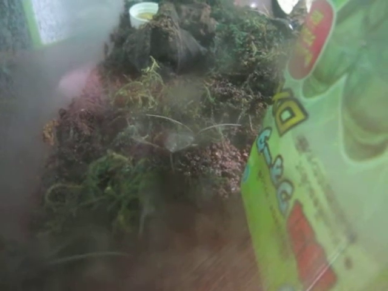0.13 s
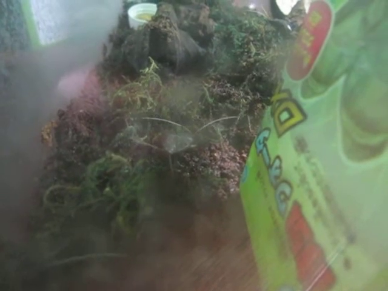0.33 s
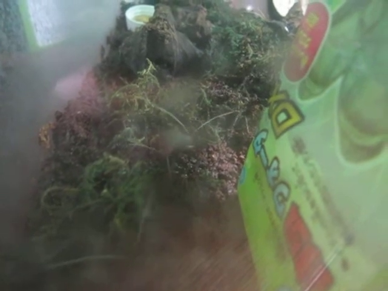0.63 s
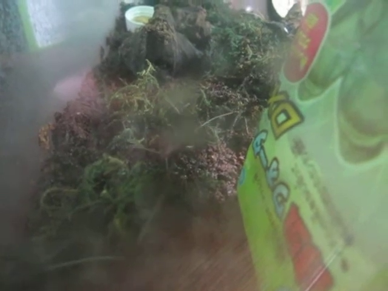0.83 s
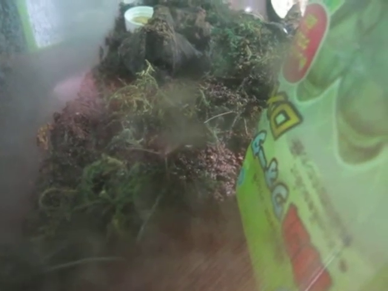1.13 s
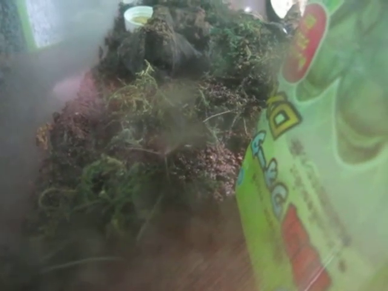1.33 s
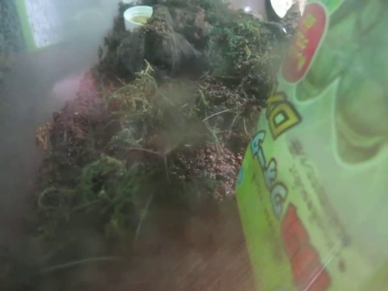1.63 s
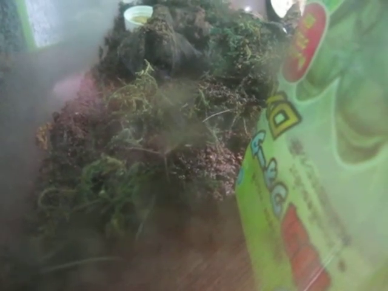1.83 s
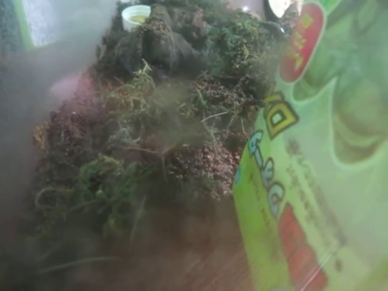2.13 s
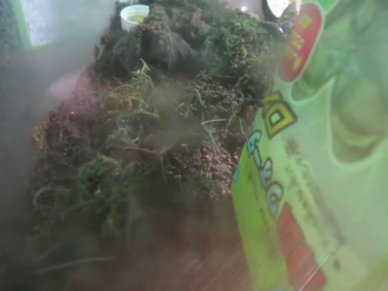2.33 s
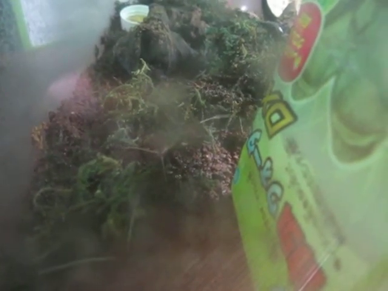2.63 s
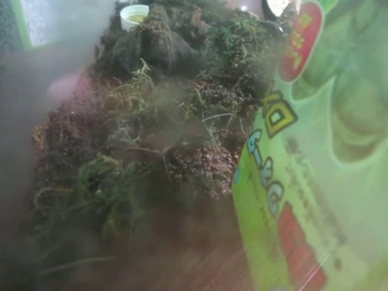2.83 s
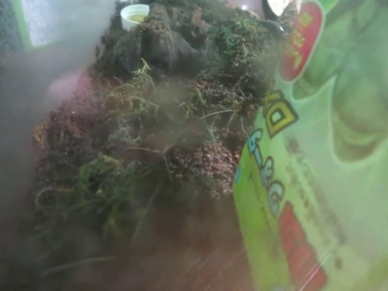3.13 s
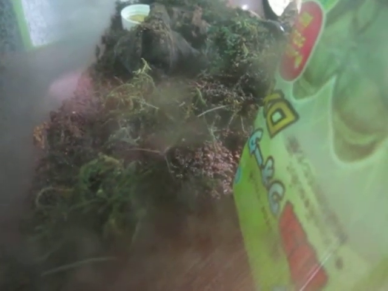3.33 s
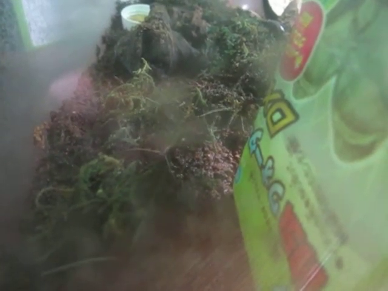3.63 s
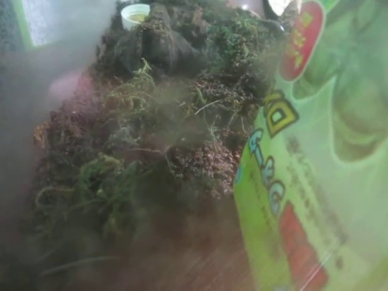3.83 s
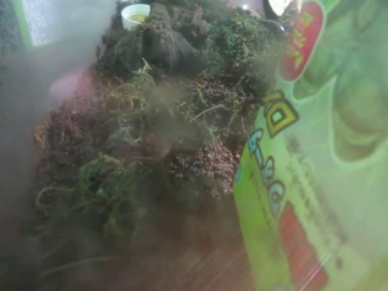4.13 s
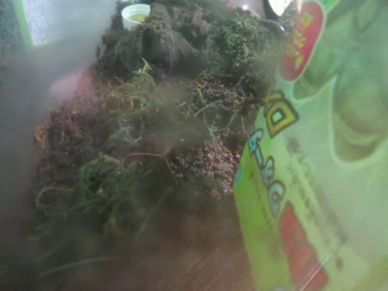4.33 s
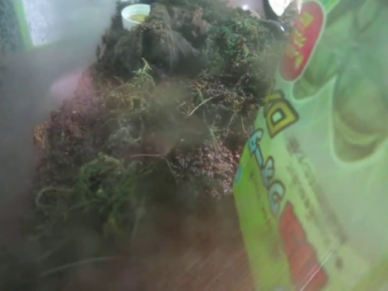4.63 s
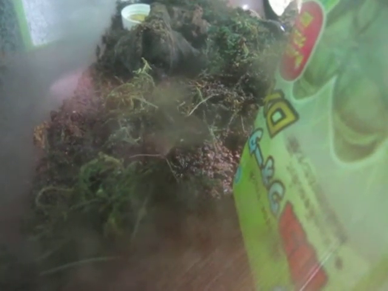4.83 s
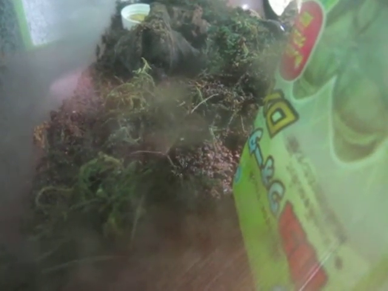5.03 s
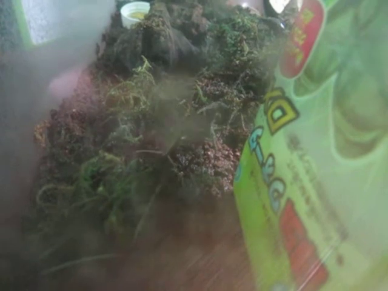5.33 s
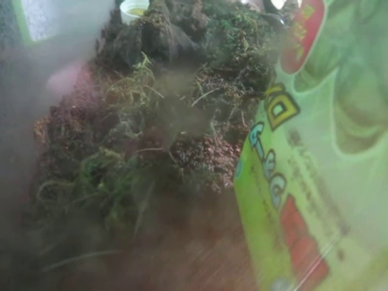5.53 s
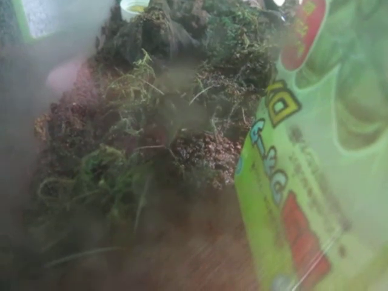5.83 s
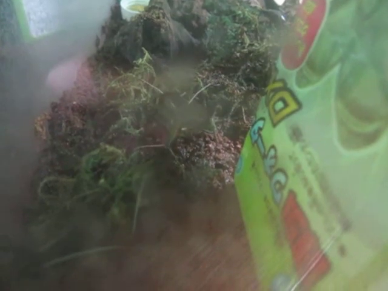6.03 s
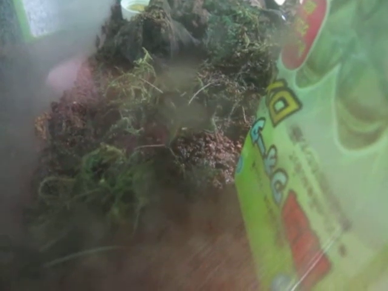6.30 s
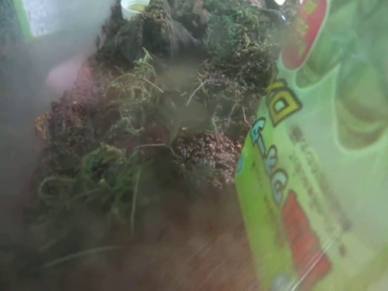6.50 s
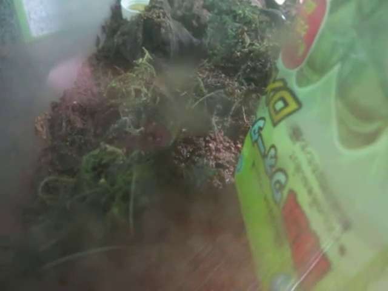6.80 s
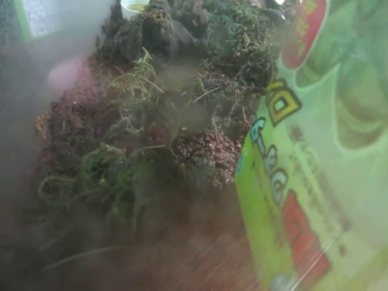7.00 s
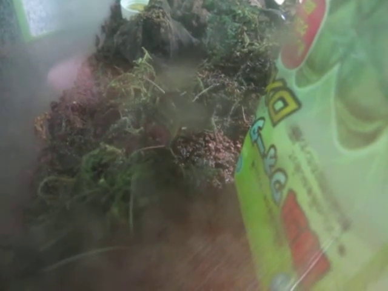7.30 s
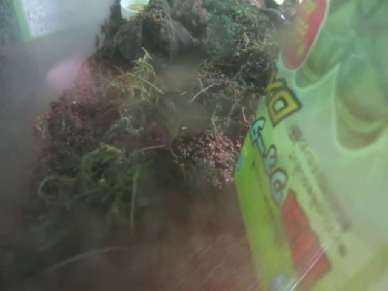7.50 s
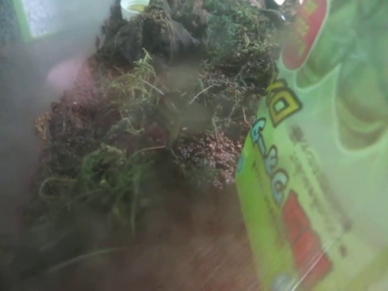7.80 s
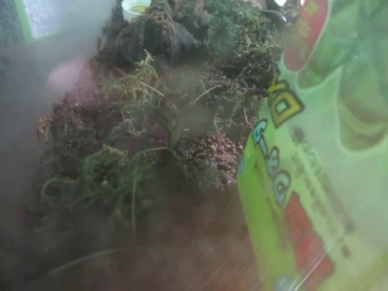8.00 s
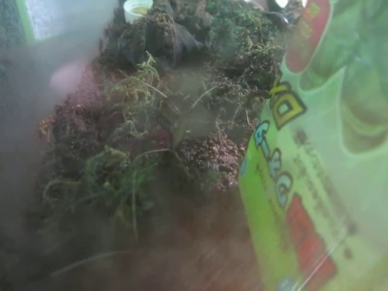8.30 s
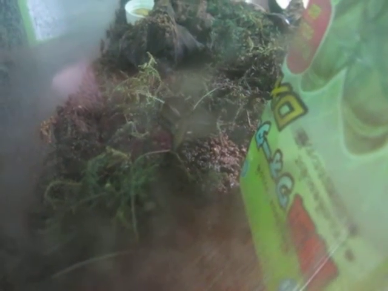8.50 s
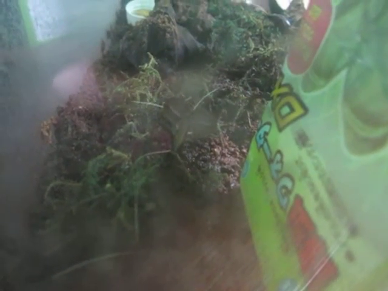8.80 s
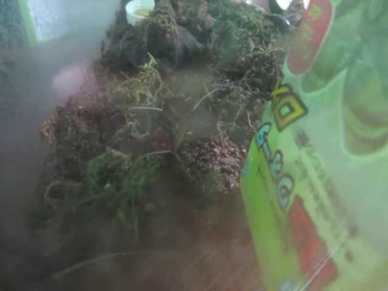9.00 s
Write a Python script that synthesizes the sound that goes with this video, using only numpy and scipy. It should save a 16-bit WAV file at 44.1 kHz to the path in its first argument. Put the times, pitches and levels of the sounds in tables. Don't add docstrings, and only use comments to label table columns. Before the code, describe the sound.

A bell cricket in a small plastic tank makes faint trial rasps, then three bright ringing high trills, over lumpy water trickle, hiss and drips.

```python
import sys
import numpy as np
from scipy import signal
from scipy.io import wavfile
from scipy.ndimage import uniform_filter1d

SR = 44100
rng = np.random.default_rng(int(sys.argv[2]) if len(sys.argv) > 2 else 0)


def waveform_to_disk(signal):
    frames = np.transpose(np.atleast_2d(signal))
    scaled = np.clip(frames, -1, 1) * 32767
    samples = np.round(scaled).astype(np.int16)
    wavfile.write(sys.argv[1], SR, samples)


def to_linear_factor(level_db):
    exponent = np.asarray(level_db, float) / 20
    return 10 ** exponent


N = 403515

CRESTS = [
    4.39,
    5.581,
    7.152,
]
OPENING_GAP_S, OPENING_STROKES = 0.0232, 3
CREST_SLIP_HZ, FRESH_SLIP_HZ = 240, 380


def evened(x):
    return x / np.sqrt(np.mean(x ** 2) + 1e-20)


def resonate(x, hz, width):
    r = np.exp(-np.pi * width / SR)
    return 2 * signal.lfilter([1 - r], [1, -r * np.exp(2j * np.pi * hz / SR)], x).real


def resonate_twice(x, hz, width):
    return resonate(resonate(x, hz, width), hz, width)


def wander(per_s):
    return evened(signal.lfilter(*signal.butter(2, per_s, fs=SR), rng.standard_normal(N)))


def noise(colour, patchy_db, wide, long):
    frames, hz = N // 128 + 5, np.fft.rfftfreq(512, 1 / SR)
    real, imag, patches = rng.standard_normal((frames, 257, 3)).T
    patches = uniform_filter1d(patches, wide, 0)
    patches = evened(uniform_filter1d(patches, long, 1))
    f, db = np.transpose(colour)
    shape_db = np.interp(np.log(hz + 1), np.log(f + 1), db, left=-60, right=-60)
    spectra = (real + 1j * imag) * to_linear_factor(shape_db[:, None] + patchy_db * patches)
    return evened(signal.istft(spectra, nperseg=512, noverlap=384)[1][:N])


def add(mix, s, sound):
    part = mix[round(s * SR):][:len(sound)]
    part += sound[:len(part)]


def pings(events, t60, rough):
    out, t = np.zeros(N), np.arange(3000) / SR
    for s, db, hz in events:
        grit = evened(resonate(rng.standard_normal(len(t)), hz, 0.1 * hz))
        ring = np.sin(2 * np.pi * hz * t) + rough * grit
        level = to_linear_factor(db - 4 - 60 * t / t60) * np.minimum(t / 0.00077, 1)
        add(out, s, level * ring)
    return out


def trickle(t):
    # freq_hz, level_db per Hz
    water_colour = [(290, -51), (500, -15.5), (649, -32), (759, -9), (903, -1), (1040, -8), (1190, -1.5),
                    (1580, -4), (1990, 0), (2210, -6.5), (2500, -2.5), (2920, -17.5), (4000, -25),
                    (5200, -43), (8800, -120)]
    # freq_hz, width_hz, level_db
    pipe_modes = [(780, 47, -6), (887, 20, 4.5), (1175, 7.5, -9), (1650, 33, -24), (2044, 9.5, 8),
                  (2439, 28, -0.5), (2725, 68, -3.5)]
    # centre_s, rise_db over the trickle, half_length_s
    surges = [(0.086, 4, 0.017), (0.22, 6, 0.032), (0.328, 5.5, 0.046), (0.446, 5, 0.015),
              (0.538, 4.5, 0.02), (0.714, 5.5, 0.047), (0.87, 3, 0.078), (1.03, 4.5, .1),
              (1.565, 3.5, 0.092), (1.894, 4, 0.082), (2.086, 1.5, .05), (2.713, 3, 0.35),
              (3.05, 2.5, 0.12), (3.27, 4.5, 0.033), (3.76, 4, 0.2), (4.01, 5.5, 0.026), (4.163, 5.5, .06),
              (4.68, 3.5, 0.27), (5.104, 5.5, 0.083), (5.887, 3.5, 0.054), (6.047, 5.5, 0.02),
              (6.17, 5, 0.027), (6.604, 2.5, 0.62), (7.16, 1.5, 0.072), (7.42, 2.5, 0.018),
              (7.57, 4, 0.072), (8.078, 4, 0.16), (8.442, 5.5, 0.013), (8.57, 4, 0.073), (8.9, 3.5, 0.3)]
    water = noise(water_colour, 1.87, wide=8, long=12) * to_linear_factor(0.88 * wander(30))
    strength = to_linear_factor(2.76 * np.minimum(rng.exponential(1, N), 4))
    falls = rng.random(N) < 400 / SR
    splash = strength * falls * rng.choice([-1, 1], N)
    pipe = sum(to_linear_factor(db) * resonate(splash, hz, width) for hz, width, db in pipe_modes)
    level_db = -45 + 0.8 * wander(11)
    for s, db, half_s in surges:
        level_db += db * np.exp(-((t - s) / half_s) ** 2)
    return to_linear_factor(level_db) * evened(water + to_linear_factor(-4.5) * evened(pipe))


def hum(t):
    # freq_hz, level_db rms
    lines = [(59.2, -61.5), (118.4, -64.5), (360.7, -62.5)]
    out = np.zeros(N)
    for hz, db in lines:
        phase = 2 * np.pi * hz * t + 0.052 * np.sqrt(hz) * wander(5.4)
        out += to_linear_factor(db + 2.95 * wander(6.9)) * np.sqrt(2) * np.sin(phase)
    return out


def hiss():
    # freq_hz, level_db per Hz
    hiss_colour = [(1500, -29), (2700, -17), (3000, -2.5), (3500, -10), (3900, -6), (4220, -2), (4600, -3),
                   (5300, -9), (6300, -8), (8640, -9), (10100, -13.5), (13600, -16.5), (16000, -19)]
    return to_linear_factor(-55) * noise(hiss_colour, 2.05, wide=40, long=10)


def rumble():
    # freq_hz, level_db per Hz
    rumble_colour = [(12, -36), (20, -6), (59, -9.5), (161, -1), (236, -2), (280, 1), (348, -2.5),
                     (544, -7.5), (800, -4), (1040, -2.5), (1760, -120)]
    return to_linear_factor(-53) * noise(rumble_colour, 1.0, wide=3, long=14)


def ticks():
    # start_s, peak_db, pitch_hz
    leaf_ticks = [
        (0.8769, -53, 13200),
        (1.0335, -46, 9600),
        (3.5588, -43, 11800),
        (3.5912, -56, 8300),
        (3.6152, -62.5, 10000),
        (3.9719, -43, 9600),
    ]
    return pings(leaf_ticks, t60=0.055, rough=0.82)


def scrapes(t):
    # start_s, length_s, level_db, pitch_hz
    loose_rubs = [
        (0.897, .13, -56, 4800),
        (2.856, .14, -56.5, 5600),
        (2.978, .19, -56, 5420),
        (2.834, 0.26, -58, 4760),
        (3.25, 0.091, -63, 5560),
        (3.37, .08, -60, 5460),
        (3.53, .04, -55, 5420),
    ]
    out = np.zeros(N)
    for s, length, db, hz in loose_rubs:
        since = t[:round(length * SR)]
        throb = 1 + 0.27 * np.cos(2 * np.pi * 50 * since)
        grit = rng.standard_normal(len(since)) * throb
        level = to_linear_factor(db) * np.clip(np.minimum(since, length - since) / 0.014, 0, 1)
        add(out, s, level * evened(resonate_twice(grit, hz, 400)))
    return out


def drips():
    # start_s, peak_db, pitch_hz
    drops = [(1.565, -26.5, 2000), (2.046, -28.5, 2550), (2.133, -27, 2050), (2.315, -30, 894),
             (2.803, -27, 2100), (3.234, -28, 2100), (3.454, -35, 2050), (3.673, -28, 2050),
             (3.738, -26, 2050), (3.825, -25.5, 930), (5.204, -27, 2050), (5.381, -30, 2390),
             (5.553, -29, 950), (5.834, -43, 930), (6.362, -33.5, 2080), (6.996, -40, 2100),
             (7.387, -31, 1230), (8.78, -38, 1950)]
    # start_s, peak_db, pitch_hz
    knock = [
        (3.824, -30, 603),
    ]
    return pings(drops + knock, t60=0.028, rough=0.11)


def manner(t):
    # time_s, level_db
    effort = [
        [(2.52, -52), (2.58, -60), (2.68, -41.5), (2.83, -41)],
        [(3.45, -45), (3.6, -42.5), (3.8, -41), (4.0, -41), (4.1, -50), (4.19, -43), (4.27, -43)],
        [(4.31, -28.5), (4.39, -17.5), (4.5, -20), (4.72, -20.5), (4.95, -31.5), (5.1, -34), (5.18, -44),
         (5.24, -42), (5.46, -41)],
        [(5.5, -28.5), (5.57, -16.5), (5.88, -18.5), (6.06, -23.5), (6.2, -28.5), (6.5, -32.5), (6.66, -29),
         (6.78, -42), (7.03, -38)],
        [(7.07, -31), (7.14, -17), (7.5, -18.5), (7.65, -25), (7.8, -26), (8.0, -28), (8.2, -28.5),
         (8.26, -34.5), (8.33, -35.5)],
    ]
    slack_db, grip_db = -38, -32.5
    db = np.interp(t, *np.transpose(sum(effort, [])))
    grip = np.clip((db - slack_db) / (grip_db - slack_db), 0, 1)
    since = np.subtract.outer(t, CRESTS)
    fresh = (np.exp(-np.maximum(since, 0) / 0.3) * (since > 0)).max(-1)
    opening = ((since > -OPENING_STROKES * OPENING_GAP_S + .01) & (since < .005)).any(-1)

    def blend(slack, tired, new, first):
        gripped = tired + fresh * (new - tired)
        return np.where(opening, first, slack + grip * (gripped - slack))

    peak_db = db + 8 * (1 - grip)
    tooth_hz = blend(4825, 4930, 4985, 5040)
    contact_s = blend(0.012, 0.02, 0.023, 0.026)
    slip_hz = blend(240, 140, FRESH_SLIP_HZ, 90)
    return peak_db, tooth_hz, contact_s, slip_hz, grip


def strokes():
    # first_s, last_s, strokes (count), back_db under the forward stroke
    runs = [(2.516, 2.576, 2, -15), (2.685, 2.725, 3, -19), (2.785, 2.826, 3, -19), (3.457, 3.478, 2, -19),
            (3.537, 3.558, 2, -19), (3.6, 3.845, 13, -17), (3.8655, 4.1, 12, -13), (4.186, 4.32, 7, -11),
            (4.427, 4.797, 19, -6), (4.8165, 5.056, 13, -9), (5.0775, 5.4, 16, -15), (5.422, 5.486, 4, -4),
            (5.514, 5.514, 1, -9), (5.617, 5.686, 4, -5), (5.7075, 6.079, 19, -6),
            (6.0995, 6.5527, 23, -10), (6.574, 6.66, 5, -9), (6.683, 7.054, 17, -5), (7.082, 7.082, 1, -6),
            (7.19, 7.28, 5, -5), (7.302, 7.578, 14, -6), (7.5995, 7.9535, 18, -9), (7.975, 8.259, 14, -8),
            (8.281, 8.325, 3, -3)]
    uneven_db = 1.7
    regular = np.concatenate([np.linspace(first, last, count) for first, last, count, _ in runs])
    lighter_db = np.repeat([run[3] for run in runs], [run[2] for run in runs])
    openings = np.subtract.outer(CRESTS, OPENING_GAP_S * np.arange(1, OPENING_STROKES)).ravel()
    s = np.concatenate([regular, openings, CRESTS])
    db, _, contact_s, slip_hz, grip = manner(s)
    crest = np.isin(s, CRESTS)
    contact_s = np.where(crest, 0.046, contact_s)
    slip_hz = np.where(crest, CREST_SLIP_HZ, slip_hz)

    late, strong, back, off, long = rng.standard_normal((len(s), 5)).T
    in_run = np.arange(len(s)) < len(regular)
    spread_db = uneven_db + 1.5 * (1 - grip) * (s > CRESTS[0])
    s = s + 0.0008 * late * in_run
    db = db + spread_db * np.clip(strong, -2, 1.5) * in_run
    flat_hz = 14 * off * in_run
    contact_s = contact_s * np.exp(0.08 * long * in_run)
    forward = np.transpose([s, db, contact_s, slip_hz, flat_hz])

    back_db = db + np.resize(lighter_db, len(s)) + uneven_db * back
    back_flat_hz = 0.6 * grip * slip_hz + flat_hz
    returns = np.transpose([s + 0.0115, back_db, np.full(len(s), 0.008), 0.5 * slip_hz, back_flat_hz])
    return np.vstack([forward, returns[in_run]])


def file_and_scraper(t):
    # multiple (of the first), level_db under the first at full effort
    overtones = [(2, -22), (3, -29.5)]
    steady = np.cumsum(manner(t)[1] + 18 * wander(300)) / SR
    flutter = to_linear_factor(1.3 * wander(250))
    drive, scratch, shake = np.zeros((3, N))
    for s, db, contact_s, slip_hz, flat_hz in strokes():
        since = np.arange(round(contact_s * SR)) / SR
        left = contact_s - since
        start = round((s - 0.562 * contact_s) * SR)
        now = slice(start, start + len(since))

        slipped = (1 + np.tanh((.3 * min(contact_s, .018) - left) / .0009)) / 2
        bite = .9 * np.exp(-since / .003)
        glide = .2 * (since / contact_s - .5)
        bend_hz = slip_hz * (bite - .68 * slipped - glide)
        turns = steady[now] + np.cumsum(bend_hz - flat_hz) / SR

        thin_db = min(0.27 * (-19.5 - db), 3) - .8 * max(-31 - db, 0)
        teeth = np.cos(2 * np.pi * turns)
        for k, over_db in overtones:
            teeth += to_linear_factor(over_db + thin_db) * np.cos(2 * np.pi * k * turns)

        rise_s = min(.5 * contact_s, .009)
        ramp = np.minimum(1, np.minimum(since / rise_s, left / .002))
        press = np.sin(np.pi / 2 * ramp) ** 2 * (1 - .2 * slipped)
        drive[now] += to_linear_factor(db) * press * flutter[now] * teeth
        touch = slip_hz / 90 * since / 0.001 * np.exp(-since / 0.00064)
        scratch[now] += to_linear_factor(db + 3.36 * thin_db) * (touch + 0.27 * press)
        jolt = np.exp(-since / 0.0077) * np.minimum(since / .001, 1)
        shake[now] += to_linear_factor(db - 3 + .4 * (db + 18)) * (slip_hz / FRESH_SLIP_HZ) ** 2 * jolt
    return drive, scratch, shake


def membrane(drive):
    # freq_hz, width_hz, level_db
    wing_modes = [(4965, 230, 0), (4790, 260, -6), (9930, 520, 0), (15020, 600, 0), (14370, 450, 3),
                  (14760, 300, 3)]
    return to_linear_factor(5.0) * sum(to_linear_factor(db) * resonate_twice(drive, hz, width) for hz, width, db in wing_modes)


def wing_margins(scratch):
    # freq_hz, width_hz, level_db
    margin_modes = [(4670, 150, -25), (5300, 240, -30.5), (5240, 150, -16.5), (5740, 190, -36),
                    (10550, 170, -37), (10800, 890, -40.5), (15600, 300, -36), (13200, 4100, -47)]
    grit = scratch * rng.standard_normal(N)
    return to_linear_factor(18.0) * sum(to_linear_factor(db) * resonate(grit, hz, width) for hz, width, db in margin_modes)


def wing_shake(shake):
    return resonate_twice(shake * rng.standard_normal(N), 5450, 800)


def cricket(t):
    drive, scratch, shake = file_and_scraper(t)
    return membrane(drive) + wing_shake(shake) + wing_margins(scratch)


def tank(x):
    # delay_s, level_db
    wall_echoes = [(.0022, -9), (.0041, -11), (.0067, -15), (.0105, -16)]
    t = np.arange(SR // 2) / SR
    tail = rng.standard_normal(len(t)) * to_linear_factor(-60 * t / .6) * (t > .008)
    path = to_linear_factor(-11) * tail / np.linalg.norm(tail)
    path[0] = 1
    for s, db in wall_echoes:
        path[round(s * SR)] += to_linear_factor(db)
    return signal.fftconvolve(x, path / np.linalg.norm(path))[:N]


def scene():
    t = np.arange(N) / SR
    room = trickle(t) + hum(t) + hiss() + rumble() + ticks() + drips()
    insect = tank(scrapes(t) + cricket(t))
    return (insect + room)[None]


def band_limit(x):
    return signal.sosfilt(signal.butter(12, 16730, fs=SR, output="sos"), x)


def record(dry):
    low_pass = signal.firwin(511, 15740, fs=SR)
    mix = signal.oaconvolve(dry, low_pass[None], "same")
    return band_limit(mix)


dry = scene()
out = record(dry)
waveform_to_disk(out)
```